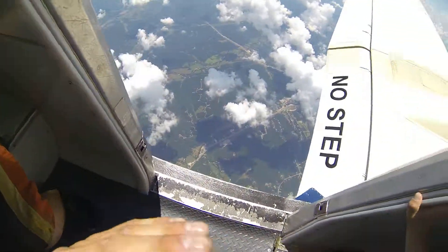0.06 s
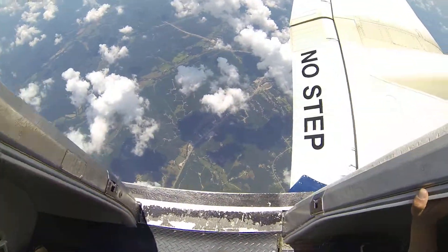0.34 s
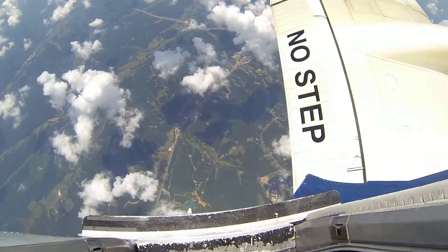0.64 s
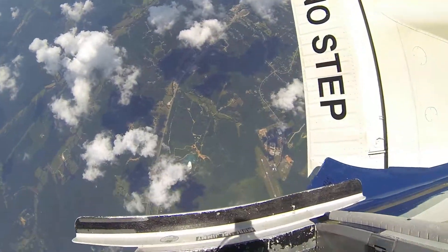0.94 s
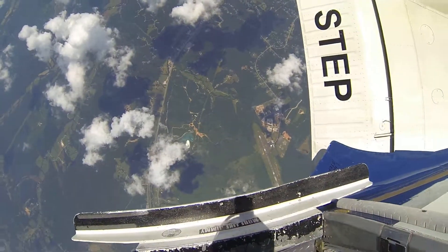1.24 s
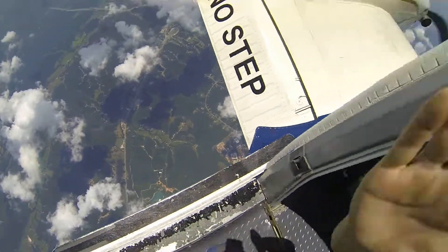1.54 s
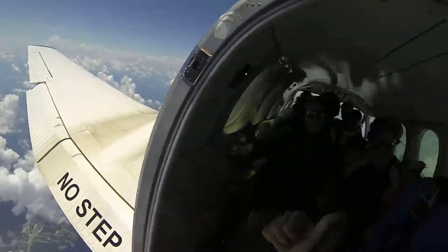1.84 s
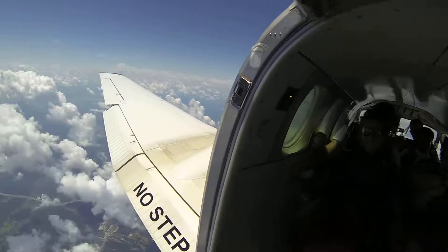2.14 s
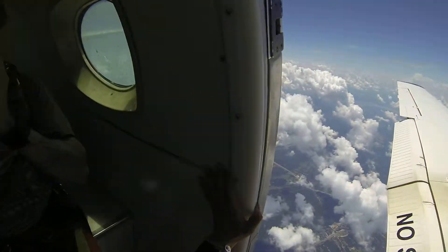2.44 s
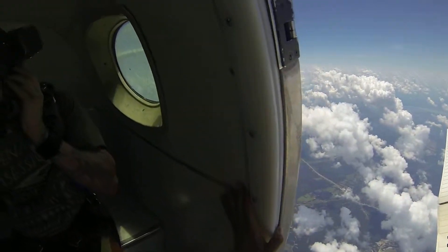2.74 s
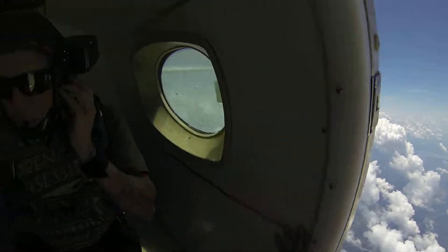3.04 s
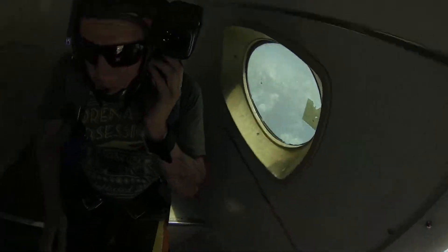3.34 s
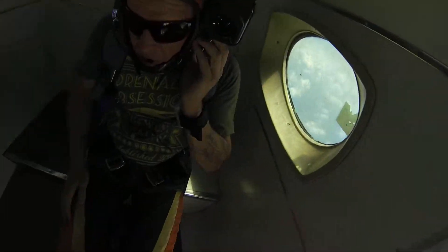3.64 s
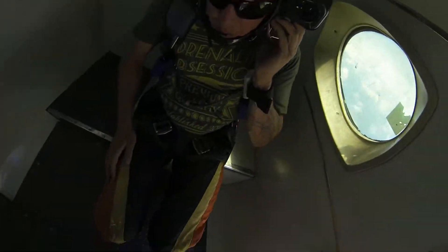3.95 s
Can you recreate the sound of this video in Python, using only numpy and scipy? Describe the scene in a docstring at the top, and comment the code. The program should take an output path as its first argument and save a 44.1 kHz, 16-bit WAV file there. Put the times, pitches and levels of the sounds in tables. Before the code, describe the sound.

Wind buffets and howls against a microphone in the open door of a flying plane, over a propeller drone. A loud double knock on the camera briefly ducks the roar, then cabin air throbs with scattered thumps.

```python
"""A small camera is held in the open door of an aircraft in flight. At first the slipstream buffets
the housing and howls in its cavity, under a wide hiss and over the drone of the propeller.
At about 1.6 s a double knock on the housing overloads the microphone, and the gain control ducks
the roar. Then the cabin air swells to a throb, like a blown bottle, and single slaps of air strike.
From 2.1 s the camera turns back past the door frame into the cabin, and the hiss changes colour."""
import sys
import numpy as np
from scipy import signal
from scipy.fft import rfft, irfft
from scipy.io import wavfile
from scipy.ndimage import minimum_filter1d

SR = 44100
rng = np.random.default_rng(int(sys.argv[2]) if len(sys.argv) > 2 else 0)


def unload_audio(sound):
    """Save the sound as a 16-bit wav file, at the path given as the first command line argument."""
    columns = np.transpose(np.atleast_2d(sound))
    # keep every value between -1 and 1, then stretch to whole-number steps
    steps = np.round(np.clip(columns, -1, 1) * 32767)
    wavfile.write(sys.argv[1], SR, steps.astype(np.int16))


N = 176400
T = np.arange(N) / SR
BINS_HZ = np.fft.rfftfreq(N, 1 / SR)


def amp(db):
    """Amplitude ratio of a level in decibels."""
    return 10 ** (np.asarray(db) / 20)


def unit(x):
    """Normalisation to rms 1."""
    return x / np.sqrt(np.mean(x ** 2) + 1e-20)


def curve(rows, column=1):
    """Linear interpolation of one column of a timed table, at every sample."""
    rows = np.array(rows)
    return np.interp(T, rows[:, 0], rows[:, column])


def add(mix, start_s, sound):
    """Superposition of a sound on the mix."""
    part = mix[round(start_s * SR):][:len(sound)]
    part += sound[:len(part)]


def noise(spectrum, colour_db=0):
    """Spectral shaping of white noise, at rms 1: the spectrum sets only relative levels."""
    hz, db = np.transpose(spectrum)
    shape_db = np.interp(np.log(BINS_HZ + 1), np.log(hz), db, left=-100, right=-100)
    return unit(irfft(rfft(rng.standard_normal(N)) * amp(shape_db + colour_db), N))


def drift(rate_hz):
    """Random fluctuation of rms 1, low-passed at the given rate."""
    response = (BINS_HZ > 1) / (1 + (BINS_HZ / rate_hz) ** 4)
    return unit(irfft(rfft(rng.standard_normal(N)) * response, N))


def phasor(hz):
    """Complex oscillation whose phase is the integral of frequency."""
    return np.exp(2j * np.pi * np.cumsum(hz) / SR)


def narrowband(width_hz):
    """Complex envelope of a noise band: two fluctuations in quadrature."""
    return drift(width_hz / 2) + 1j * drift(width_hz / 2)


def tone(hz, wander):
    """Random frequency modulation of a sine of rms 1; wander is a fraction of the pitch."""
    return unit(phasor(hz * (1 + wander * drift(rate_hz=12.6))).imag)


# Throb of the cabin air: time_s, level_db
THROB = [(0, -19.5), (.1, -18.5), (.35, -28.5), (.5, -43), (.8, -42), (1.5, -49.5), (1.8, -35), (1.93, -18),
         (2.05, -16), (2.5, -15.5), (2.75, -18), (2.9, -17), (3.1, -18), (3.35, -22), (3.65, -35),
         (3.77, -19), (4, -41)]
# Partials of the propeller: pitch_hz, level_db
DRONE = [(102.5, -32.5), (222, -52.5), (308, -49.5)]


def cabin(throb_hz=34.7, throb_sway_db=0.6, drone_sway_db=4):
    """Helmholtz resonance: the cabin air throbs across the open door; the propeller drones behind it."""
    throb = tone(throb_hz, wander=0.024) * amp(curve(THROB) + throb_sway_db * drift(rate_hz=7.9))
    drone = sum(tone(hz, wander=0.0075) * amp(db + drone_sway_db * drift(rate_hz=8.6))
                for hz, db in DRONE)
    return throb + drone


# Wind in the open door, then on the way inside; each layer adds its own gain to these levels:
# time_s, buffeting_db, roar_db, howl_db, rush_db, hiss_db, fizz_db
WIND_OUT = [(0.0, -21, -34, -29.5, -31.5, -40, -50), (0.094, -26, -37.5, -28.5, -31.5, -39.5, -48),
            (0.242, -16.5, -29, -22.5, -28, -35, -43.5), (0.286, -20, -37, -25, -32.5, -38.5, -46),
            (0.416, -13.5, -32.5, -22.5, -29.5, -37.5, -45), (0.456, -15.5, -37.5, -36, -41, -47.5, -55),
            (0.594, -14, -28, -26.5, -37.5, -48.5, -59), (0.624, -13.5, -30, -27, -42, -50, -67),
            (0.638, -17.5, -34.5, -21.5, -37.5, -48.5, -58), (0.734, -20, -22, -20, -31, -41, -52),
            (0.802, -14.5, -20, -21.5, -32.5, -39, -54), (0.828, -15.5, -27, -27.5, -41, -49, -61),
            (0.864, -18.5, -22, -26.5, -38.5, -47, -59), (1.034, -16.5, -26.5, -24, -35.5, -46, -57),
            (1.072, -19, -27, -30.5, -40.5, -50, -61), (1.268, -16.5, -27.5, -25.5, -36.5, -46.5, -57),
            (1.368, -20, -21.5, -30.5, -39.5, -47.5, -58), (1.432, -13, -31.5, -23, -34.5, -46.5, -59),
            (1.454, -17.5, -46, -26.5, -44, -51, -61), (1.486, -47, -37, -28.5, -42.5, -56, -71),
            (1.52, -24, -45, -47, -52, -62, -66), (1.56, -24.5, -58, -44.5, -50, -58, -67)]
WIND_IN = [(1.86, -27, -43, -36, -42.5, -51, -57), (1.884, -24, -42.5, -34.5, -40.5, -49, -57),
           (1.976, -31.5, -38, -28, -35.5, -44.5, -51), (2.24, -25, -34.5, -29, -34.5, -45.5, -52),
           (2.284, -28.5, -32, -35, -31, -42.5, -48), (2.33, -26, -34, -32.5, -33.5, -41.5, -52),
           (2.4, -28.5, -37.5, -33.5, -33, -44.5, -49), (2.936, -21.5, -35.5, -31.5, -33.5, -44.5, -47.5),
           (3.132, -24, -34, -32.5, -35, -44.5, -49), (3.14, -16, -36, -31, -33.5, -40.5, -48),
           (3.17, -20.5, -47, -36, -38.5, -48, -55), (3.284, -18, -30.5, -34, -37, -44, -51.5),
           (3.344, -18.5, -41, -42, -43, -50.5, -57), (3.422, -22.5, -36, -41, -43, -50.5, -59),
           (3.48, -23, -41, -39.5, -45.5, -49.5, -59), (3.496, -22, -41, -36, -41, -50, -56),
           (3.584, -21.5, -28, -36.5, -37.5, -44, -55), (3.616, -12, -33.5, -35, -33.5, -42.5, -49),
           (3.628, -15, -41, -37.5, -41.5, -49.5, -58), (3.738, -27.5, -36.5, -34.5, -37.5, -44.5, -51),
           (3.902, -14.5, -30, -32, -32, -41.5, -49), (3.98, -20, -31, -31.5, -32.5, -41, -49)]
WIND = WIND_OUT + WIND_IN
# Shedding rate of the eddies: time_s, centre_hz
EDDIES = [(0, 90), (.55, 88), (.75, 112), (1.45, 114), (1.9, 84), (3.0, 82), (3.3, 97), (4, 86)]
# Spectrum of the rumble: frequency_hz, density_db
RUMBLE = [(12, -18), (25, -1), (48, -5), (70, -7), (90, -4), (150, -4), (400, -93)]


def buffeting(width_hz=77.4, evenness=0.2, eddy_db=1.73, rumble_db=-12.5):
    """Vortex shedding: eddies leave the housing at an uneven rate, over a deep rumble."""
    envelope = narrowband(width_hz)
    envelope /= (abs(envelope) ** 2 + 0.1) ** (evenness / 2)  # softens the strongest eddies
    eddies = unit((envelope * phasor(curve(EDDIES))).real)
    return amp(curve(WIND)) * (amp(eddy_db) * eddies + amp(rumble_db) * noise(RUMBLE))


# Broad resonance of the cavity, before any shift: frequency_hz, density_db
HOWL = [(300, -11), (500, -11), (620, -19.5), (760, -16), (950, -14.5), (1080, -5.5), (1210, -2),
        (1400, -2.5), (1580, -4), (1800, -17), (2500, -38.5), (5000, -41)]
# Whistle of the cavity: time_s, pitch_hz, power_share (0 to 1)
CAVITY = [(0, 1263, 0.07), (.3, 1380, 0.03), (.55, 1266, 0.43), (.7, 1380, 0), (.88, 1234, 0.5),
          (1.2, 1230, 0.27), (1.45, 1300, 0.28), (1.9, 1259, 0.36), (2.15, 1254, 0.42), (2.4, 1370, 0.12),
          (3.3, 1361, 0.34), (4, 1425, 0)]


def howl(centre_hz=1333, whistle_width_hz=130):
    """Cavity resonance: a broad band shifts with the wind's angle and partly narrows to a whistle."""
    pitch_hz = curve(CAVITY)
    share = np.clip(curve(CAVITY, column=2), 0, 1)
    shift_hz = 0.5 * (pitch_hz - centre_hz)  # the band moves half as far as the whistle
    broad = signal.hilbert(noise(HOWL)) * phasor(shift_hz)
    whistle = narrowband(whistle_width_hz) * phasor(pitch_hz)
    return np.sqrt(1 - share) * broad.real + np.sqrt(share) * whistle.real


# Narrow peaks and dips at each place: centre_hz, width_hz, slipstream_db, door_frame_db, cabin_db
COLOURS = [(815, 170, 1, -1.5, -4), (2040, 170, -2, 3, 1.5), (2810, 350, 1.5, 2, -1),
           (3330, 310, 1.5, 3.5, 3), (3920, 88, -1.5, -3, -7), (4710, 270, 3, 4.5, 7),
           (5100, 190, 5, 1, 4.5), (6400, 190, -6.5, -8, 3), (6530, 290, 4, 9, -6.5),
           (7100, 300, -2, 1.5, 5), (7800, 250, 0.5, 3, -6), (9150, 200, -2, -2, 6),
           (9600, 200, 1.5, -1, -5), (10270, 520, 1, -9, 3), (13100, 310, 6, 2, 4)]
# Path of the microphone: time_s, place (0 slipstream, 1 door frame, 2 cabin)
PLACE = [(0, 0.37), (.4, .8), (.5, 0), (2.1, 0), (2.33, 1.02), (3.05, 1), (3.3, 1.87), (4, 2.08)]


def coloured_by_place(spectrum):
    """Spectral colouration: an equal-power crossfade of three noises, one for each place."""
    colours_db = sum(np.outer(gains_db, np.exp(-((BINS_HZ - hz) / width_hz) ** 2))
                     for hz, width_hz, *gains_db in COLOURS)
    place = np.clip(curve(PLACE), 0, 2)
    weights = [np.sqrt(np.maximum(1 - abs(place - k), 0)) for k in range(len(colours_db))]
    return sum(weight * noise(spectrum, db) for weight, db in zip(weights, colours_db))


# Spectra of the flow noise, from low to high: frequency_hz, density_db
ROAR = [(80, -22), (165, -1), (205, 5), (260, -0.5), (315, 0.5), (400, -5), (500, -11.5), (650, -15.5),
        (800, -15), (950, -14.5), (1300, -25), (3000, -55)]
RUSH = [(300, -8), (700, -2.5), (950, -8), (1300, -1.5), (1650, -0.5), (2050, 1.5), (2220, -3), (2420, 1),
        (2850, -7.5), (3350, -8), (3900, -15), (4700, -42), (8000, -28.5)]
HISS = [(2500, -16), (3900, 2.5), (4800, -0.5), (6000, -1), (7800, -4), (8600, -8.5), (10000, -13.5),
        (13000, -35)]
FIZZ = [(7500, -8), (9500, -4.5), (10600, 3), (12000, -3), (13200, -1.5), (14000, -4.5), (15300, -10)]


def airflow():
    """Amplitude modulation: one flutter of the flow moves roar, howl, rush, hiss and fizz together."""
    flutter = drift(rate_hz=90.5)
    rush, hiss, fizz = (coloured_by_place(spectrum) for spectrum in (RUSH, HISS, FIZZ))
    # In the order of WIND's columns: sound, gain_db, flutter_db
    layers = [(noise(ROAR), 0.97, 2.5), (howl(), 1.03, 1.0),
              (rush, 2.72, 1.5), (hiss, 1.7, 1.0), (fizz, -0.1, 1.0)]
    return sum(sound * amp(gain_db + curve(WIND, column) + flutter_db * flutter)
               for column, (sound, gain_db, flutter_db) in enumerate(layers, start=2))


def pulse(t, peak_s):
    """Critically damped envelope, reaching 1 at peak_s."""
    return t / peak_s * np.exp(1 - t / peak_s)


# Single slaps of air: start_s, thump_db, puff_db
SLAPS = [(1.82, -12.5, -51), (2.499, -20.5, -21), (2.8, -11, -28), (3.426, -13, -25), (3.708, -8, -38)]


def slaps(thump_hz=122.4):
    """Impulsive excitation: a slap of air gives a low thump and a short puff in the cavity."""
    out, t = np.zeros(N), T[:SR // 10]
    for start_s, thump_db, puff_db in SLAPS:
        thump = pulse(t, peak_s=0.0026) * np.sin(2 * np.pi * thump_hz * t)
        puff = pulse(t, peak_s=0.0031) * noise(HOWL)[:len(t)]
        add(out, start_s, amp(thump_db) * thump + amp(puff_db) * puff)
    return out


def ringing(modes, t):
    """Free vibration: a sum of exponentially damped modes."""
    return sum(amp(db - 60 * t / t60_s) * np.sin(2 * np.pi * hz * t) for hz, db, t60_s in modes)


# Modes of the housing, and of the camera on its mount: pitch_hz, relative_db, t60_s
HOUSING_MODES = [(412, -1.5, .032), (726, -2.5, 0.026), (877, -8.5, 0.042), (1070, -8.5, .02),
                 (1476, 2.5, 0.017), (1616, -6, 0.022), (1856, -5, 0.015), (2310, -17, 0.0098),
                 (3210, -7, 0.0089), (3504, -9.5, 0.014), (7200, -15, 0.0097)]
MOUNT_MODES = [(79.6, 7, 0.065), (144, 4, 0.057), (208, 0, 0.046), (298, -14, .035)]
# Spectrum of the rattle: frequency_hz, density_db
RATTLE = [(100, 11), (700, -2), (1500, 2.5), (2000, -5), (3000, -8.5), (5000, -20), (8000, -33),
          (15000, -58)]
# Contacts of the double knock: start_s, rattle_db, ring_db, thud_db, rattle_t60_s, thud_lag_s
KNOCKS = [(1.585, 14, 18, 12, 0.026, .003), (1.627, 15.5, 3, 6, 0.02, .0035),
          (1.6351, 6, 0, 5, 0.019, 0.00029), (1.645, -7, -8.5, 8, 0.024, 0)]


def knocks(rise_s=0.0017, thud_rise_s=0.0014):
    """Modal response to impact: the housing rattles and rings, and the mount thuds just behind."""
    out, t = np.zeros(N), T[:SR // 5]
    onset = np.minimum(t / rise_s, 1)
    ring = ringing(HOUSING_MODES, t)
    thud = (1 - np.exp(-t / thud_rise_s)) * ringing(MOUNT_MODES, t)
    for start_s, rattle_db, ring_db, thud_db, t60_s, lag_s in KNOCKS:
        rattle = amp(rattle_db - 60 * t / t60_s) * noise(RATTLE)[:len(t)]
        add(out, start_s, onset * (rattle + amp(ring_db) * ring))
        add(out, start_s + lag_s, -amp(thud_db) * thud)
    return out


def scene():
    """Superposition of all sources at one microphone."""
    return (cabin() + buffeting() + airflow() + slaps() + knocks())[None]


def gain_control(x, limit_db=-5, attack_s=0.0012, hold_s=0.06, recover_db_per_s=128):
    """Peak limiting: the gain ducks by the excess over the limit, holds, then recovers steadily."""
    over_db = np.maximum(20 * np.log10(abs(x) + 1e-9) - limit_db, 0)
    half_hold = round(hold_s * SR / 2)
    held_db = -minimum_filter1d(-over_db, 2 * half_hold + 1, origin=half_hold)  # highest recent peak
    recovery_db = recover_db_per_s * T
    duck_db = np.maximum.accumulate(held_db + recovery_db) - recovery_db
    pole = np.exp(-1 / (attack_s * SR))
    return x * amp(-signal.lfilter([1 - pole], [1, -pole], duck_db))


def record(dry, overload_db=12.5, edge_hz=15350):
    """Saturation of the microphone, then gain control, full-scale clipping and a band limit."""
    saturated = amp(overload_db) * np.tanh(dry[0] / amp(overload_db))
    clipped = np.clip(gain_control(saturated), -1, 1)
    lowpass = signal.firwin(511, edge_hz, window=("kaiser", 9), fs=SR)
    return signal.oaconvolve(clipped, lowpass, "same")[None]


dry = scene()
out = record(dry)
unload_audio(out)
```